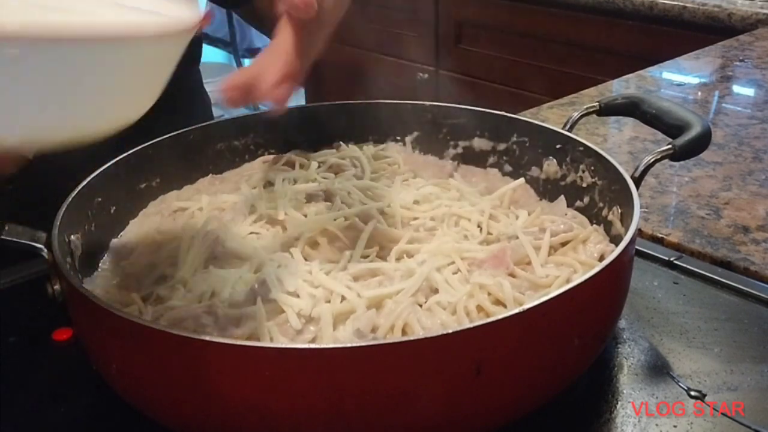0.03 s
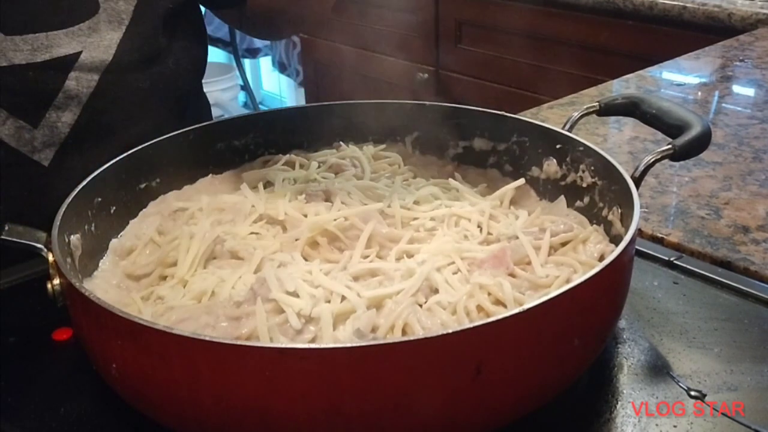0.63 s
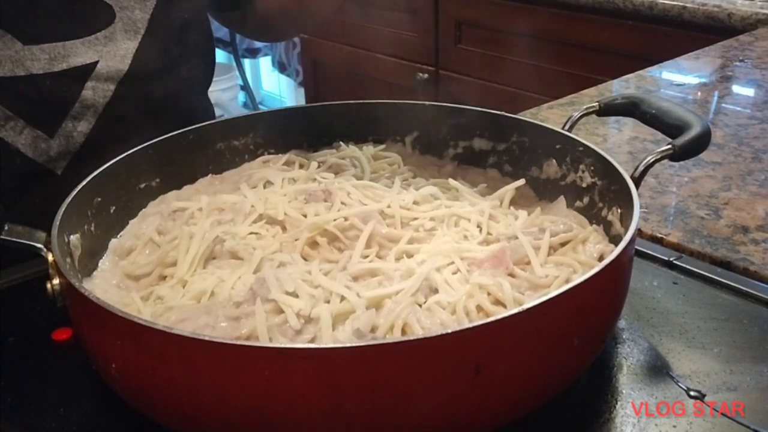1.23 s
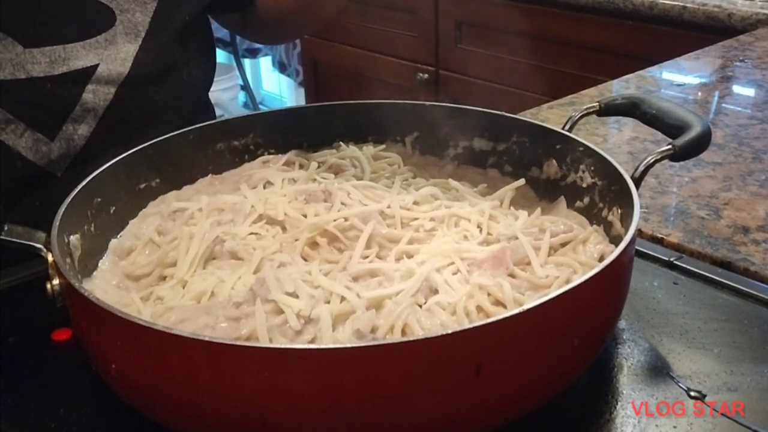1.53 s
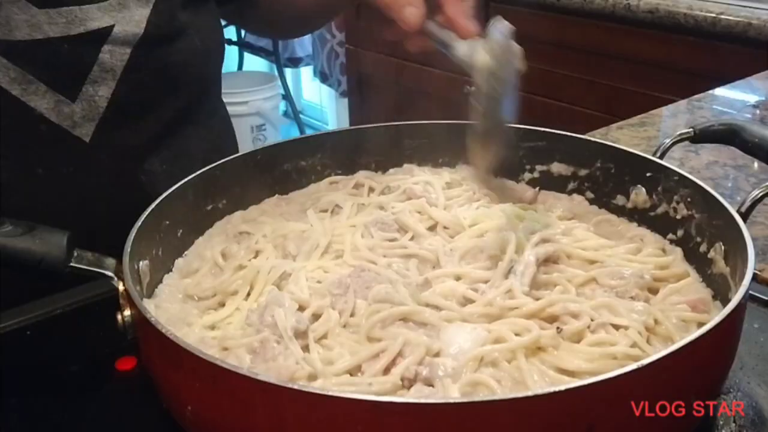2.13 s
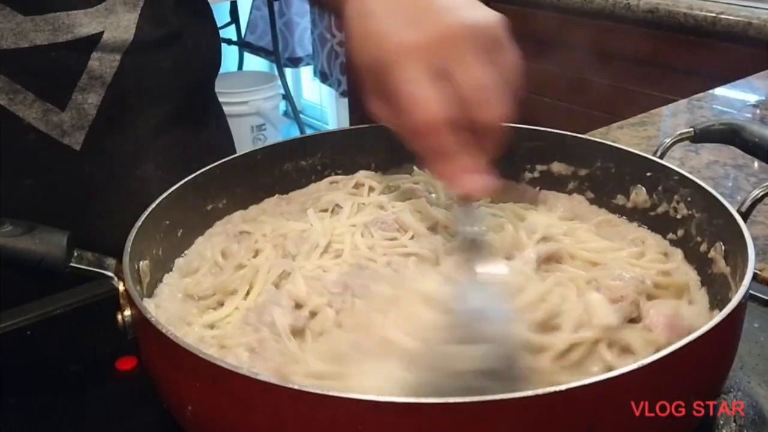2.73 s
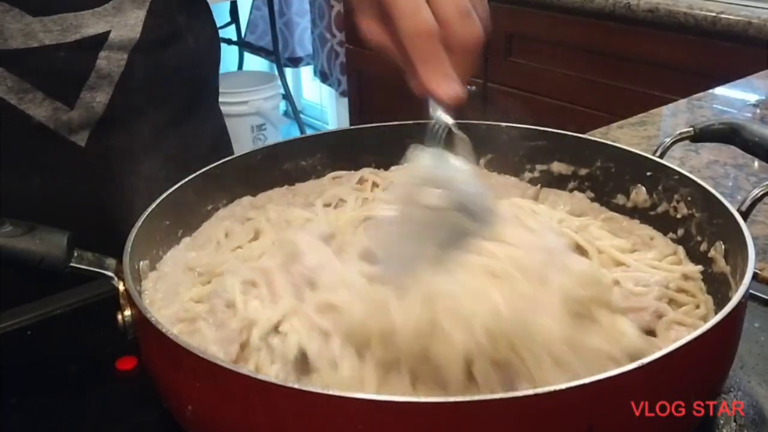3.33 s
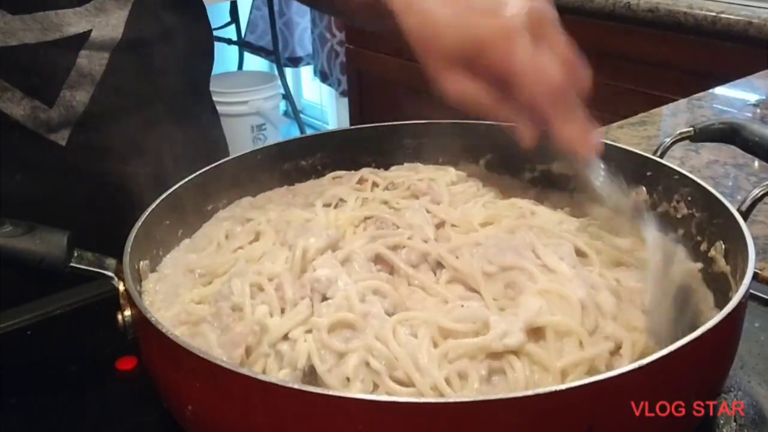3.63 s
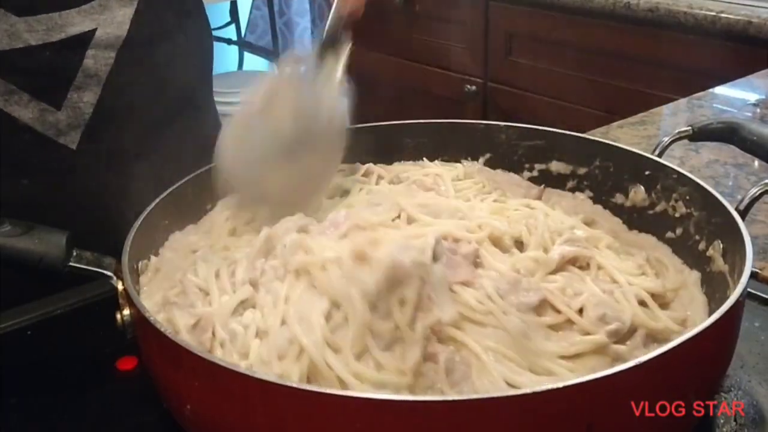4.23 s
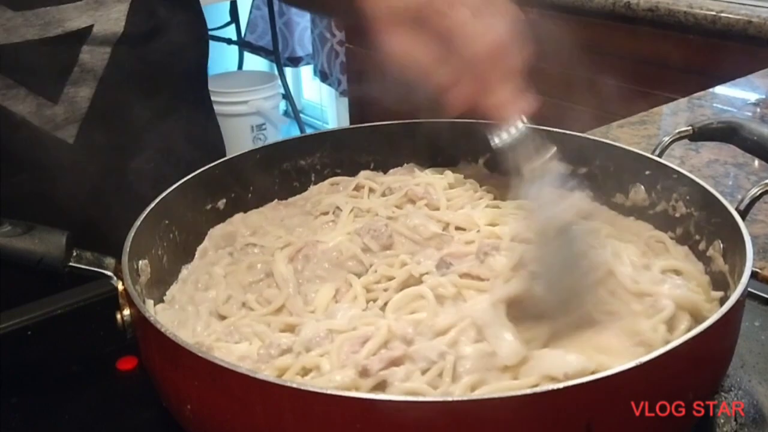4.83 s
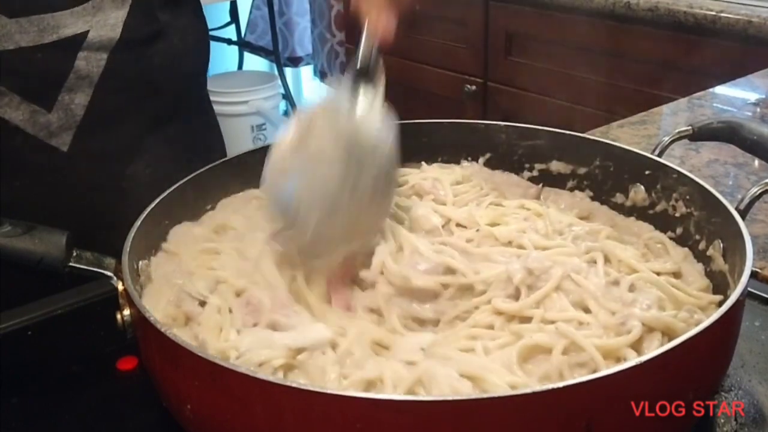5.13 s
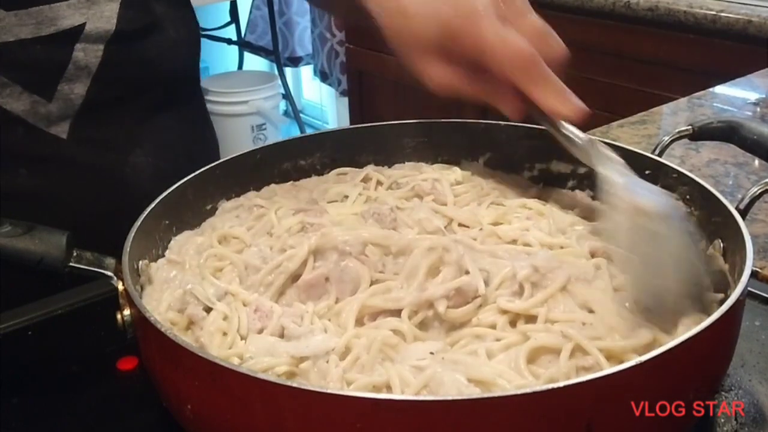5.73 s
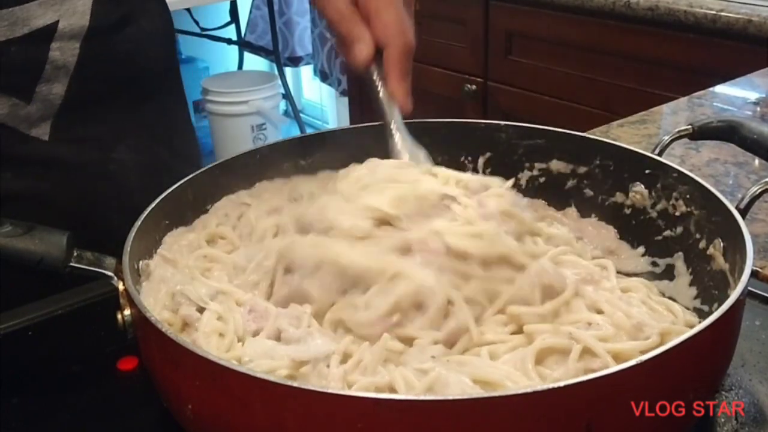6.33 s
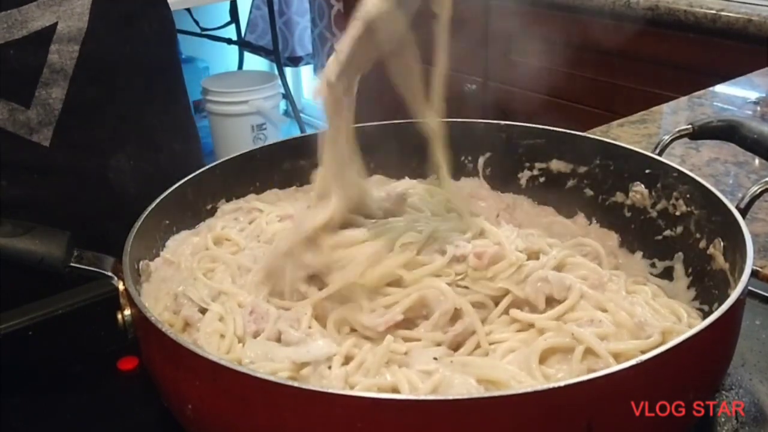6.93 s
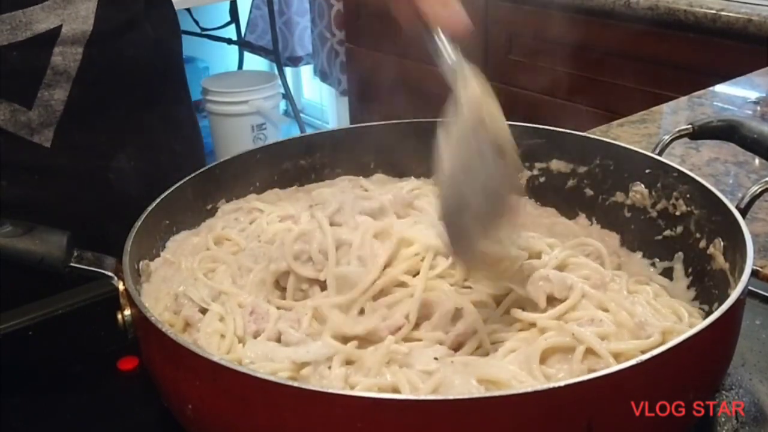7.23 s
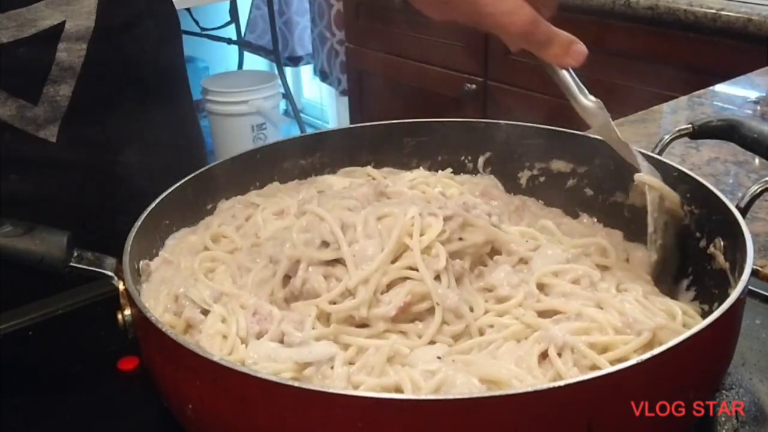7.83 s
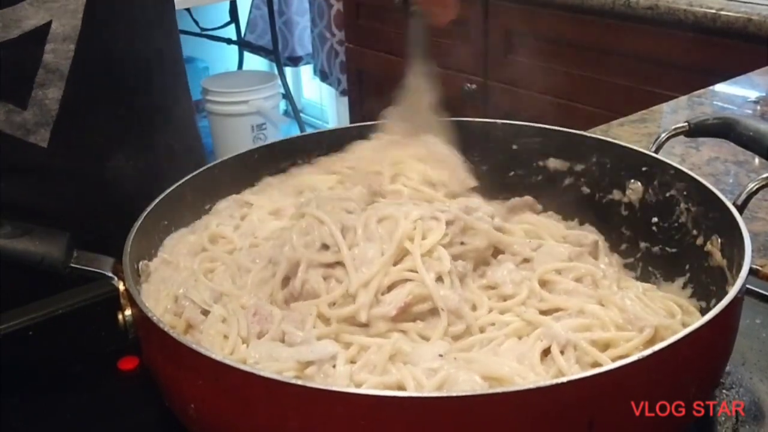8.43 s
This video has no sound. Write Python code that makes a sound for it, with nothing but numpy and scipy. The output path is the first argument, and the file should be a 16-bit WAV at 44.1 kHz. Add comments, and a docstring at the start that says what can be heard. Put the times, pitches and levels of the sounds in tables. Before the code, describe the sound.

Heard close up in a small kitchen, a stove hums faintly while creamy noodles bubble and hiss in a pan. All sound cuts out for a moment, then stirring begins: sticky slops, wet crackles and little pops, broken by short clanks and scrapes of a metal spoon on the heavy pan. Steam spurts through the sauce again, and a last run of knocks and a squeaky scrape closes the stirring.

```python
"""Creamy pasta simmers in a wide pan on a humming stove in a small kitchen, fizzing with steam.
Early on a soft hiss swells to the right, until all sound pauses for a third of a second near 2 s.
Then a steel spoon turns the noodles, which slop and crackle wetly; it scrapes and squeaks along
the wall and, from 3.6 s, knocks against the pan. Around 7 s steam spurts through the sauce again,
and a last round of knocks, turns and scrapes ends the scene."""
import sys
import numpy as np
from scipy import signal
from scipy.fft import rfft, irfft, next_fast_len
from scipy.io import wavfile
from scipy.ndimage import uniform_filter1d

SR = 44100
rng = np.random.default_rng(int(sys.argv[2]) if len(sys.argv) > 2 else 0)


def store_wav(level_fs):
    """Save 16-bit WAV to argv[1]."""
    pcm = np.round(np.clip(np.atleast_2d(level_fs), -1, 1) * 32767)
    wavfile.write(sys.argv[1], SR, pcm.T.astype(np.int16))


N = 373968


def from_db(db):
    """Turn decibels into a number to multiply by."""
    return 10 ** (np.asarray(db) / 20)


def rms_one(x):
    """Scale a sound so that its average strength (rms) is 1."""
    return x / np.sqrt(np.mean(x ** 2) + 1e-20)


def at_hz(points, hz, column=1):
    """Read a table between its frequencies, on a log scale."""
    table = np.array(points)
    return np.interp(np.log(hz + 1e-3), np.log(table[:, 0]), table[:, column])


def convolve(x, response):
    """Give every sample of a sound the same trail of echoes."""
    return signal.oaconvolve(np.atleast_2d(x), np.atleast_2d(response), axes=-1)[:, :N]


def colour(x, points, column=1, size=8192):
    """Turn lows and highs up or down as a table says (a minimum-phase filter)."""
    gains = from_db(at_hz(points, np.fft.rfftfreq(size, 1 / SR), column))
    cepstrum = irfft(np.log(gains))
    cepstrum[1:size // 2] *= 2
    cepstrum[size // 2 + 1:] = 0   # nothing rings before its cause
    return convolve(x, irfft(np.exp(rfft(cepstrum))))


def band(x, edges_hz):
    """Keep what lies between two frequencies."""
    return signal.sosfilt(signal.butter(2, edges_hz, "band", fs=SR, output="sos"), x + 1e-18)


def resonance(x, hz, width_hz):
    """Ring at one pitch: the narrower the width, the longer the ring."""
    r = np.exp(-np.pi * width_hz / SR)
    feedback = [1, -2 * r * np.cos(2 * np.pi * hz / SR), r * r]
    return signal.lfilter(np.array([1, 0, -1]) * (1 - r * r) / 2, feedback, x + 1e-18)


def drift(per_s):
    """A random curve that wanders about 1 either side of zero."""
    steps = rng.standard_normal(4096)
    return np.interp(np.arange(N) / SR * per_s, np.arange(len(steps)), steps)


def grains(per_s, spread_db, size=N):
    """Random clicks of uneven size."""
    heights = from_db(spread_db * np.minimum(rng.exponential(1, size), 4))
    return rms_one(heights * rng.choice([-1, 1], size) * (rng.random(size) < per_s / SR))


def arch(start_s, length_s, power):
    """The samples of one push and its rise and fall; a small power flattens the top."""
    at = np.arange(int(start_s * SR), min(int((start_s + length_s) * SR), N))
    return at, np.sin(np.pi * (at - at[0]) / (length_s * SR)) ** power


# how alike left and right are in the room: f/Hz, likeness (1 = the same)
LIKENESS = [(130, 0.99), (290, 0.81), (640, 0.4), (1400, 0), (3000, 0)]
def stereo_noise(size):
    """White noise, alike on both sides in the bass and unrelated in the treble."""
    padded = next_fast_len(size, True)
    mid, side = rfft(rng.standard_normal((2, padded)))
    alike = at_hz(LIKENESS, np.fft.rfftfreq(padded, 1 / SR))
    spectrum = np.sqrt(1 + alike) * mid + np.sqrt(1 - alike) * side * [[1], [-1]]
    return rms_one(irfft(spectrum, padded)[:, :size])


def kitchen(x, near_db, near_t60, far_db, far_t60, size=22050):
    """Add quick echoes off pan, hob and counter, and the room's tail; t60 is seconds to fade 60 dB."""
    t = np.arange(size) / SR
    response = np.zeros((2, size))
    for db, t60 in ((near_db, near_t60), (far_db, far_t60)):
        echoes = stereo_noise(size) * from_db(-60 * t / t60)
        response += from_db(db) * rms_one(echoes) / np.sqrt(size)
    response[:, 0] += 1   # the direct sound
    return convolve(x, rms_one(response) / np.sqrt(size))


def all_over_pan(x, near_db, far_db, far_t60, spots=4):
    """The sound hops between a few spots in the pan, each with its own echoes."""
    spot = rng.integers(0, spots, N // 128 + 2)
    shares = [np.interp(np.arange(N) / 128, np.arange(len(spot)), spot == k) for k in range(spots)]
    return sum(kitchen(x * np.sqrt(share), near_db, 0.075, far_db, far_t60) for share in shares)


# the tones of the stove: f/Hz, width/Hz, level/dB
STOVE_TONES = [(121.3, 3.3, -58.5), (212.4, 18, -68.5), (270.2, 7, -65.5), (728, 21, -64)]
def stove_hum():
    """The stove hums in a few narrow, wavering bands of noise."""
    noise = stereo_noise(N)
    return sum(from_db(db) * rms_one(resonance(noise, hz, width)) for hz, width, db in STOVE_TONES)


# the tone of the room's air: f/Hz, level/dB
AIR_COLOUR = [(25, -43), (60, -3.5), (110, -6.5), (300, -13.5), (550, -8), (900, -18.5), (1900, -24.5),
              (4000, -16), (16000, -18.5)]
def room_air():
    """The air of the room is a faint, steady rush."""
    return from_db(-57.5) * rms_one(colour(stereo_noise(N), AIR_COLOUR))


# the sauce simmering by itself: t/s, slop level/dB, crackle level/dB
SIMMER = [(0, -59, -57.5), (1.05, -62, -56), (1.3, -53.5, -51), (1.5, -56.5, -57), (5.4, -65.5, -64),
          (8.48, -55, -55)]
def simmer_power():
    """How hard the simmer drives the slop and the wavering crackle."""
    t = np.arange(N) / SR
    times, slop_db, crackle_db = np.transpose(SIMMER)
    slop = from_db(np.interp(t, times, slop_db))
    crackle = from_db(np.interp(t, times, crackle_db) + 2.5 * drift(per_s=22))
    return slop ** 2, crackle ** 2


# the notes of the filled pan: f/Hz, width/Hz, level/dB
PAN_NOTES = [(730, 28.7, 12), (1256, 16, 1), (1410, 15, -5), (1630, 33, 1), (2710, 325, 3), (3130, 30, 3.5),
             (5010, 79, -7.5)]
def pan_ring(force, ring_db):
    """Whatever touches the pan makes its notes ring too."""
    return force + sum(from_db(db + ring_db) * resonance(force, hz, width) for hz, width, db in PAN_NOTES)


# the tone of the rocking pan and of the plopping sauce: f/Hz, level/dB
RUMBLE_COLOUR = [(25, -45), (72, -19.5), (97, -2), (125, 3), (165, -23), (260, -18), (600, -59.5)]
SLOP_COLOUR = [(60, -17.5), (170, 1.5), (280, -1), (480, -4), (750, -7.5), (1200, -14), (5000, -26)]
def sauce_slop(strength):
    """Thick sauce plops in the bass and rocks the pan."""
    heaves = from_db(3.7 * drift(per_s=22))
    rumble = from_db(2) * rms_one(colour(grains(400, 3.2) * heaves, RUMBLE_COLOUR))
    plops = pan_ring(grains(700, 3.7), ring_db=2)
    plops = all_over_pan(plops, near_db=7, far_db=6.5, far_t60=0.29)
    return (rumble + rms_one(colour(plops, SLOP_COLOUR))) * strength


# spurts of steam: t/s, length/s, level/dB
SPURTS = [(0.0, 0.092, -44), (0.355, 0.02, -44.5), (0.79, 0.075, -48), (0.972, 0.019, -50),
          (1.086, 0.032, -44.5), (1.17, 0.068, -47), (1.538, 0.06, -49), (4.97, 0.14, -53),
          (6.878, 0.1, -46), (7.028, 0.084, -48.5), (7.275, 0.057, -49.5), (7.384, 0.079, -48.5),
          (7.544, 0.054, -47)]
# the tone of their fizz: f/Hz, level/dB
FIZZ_COLOUR = [(6000, -5), (8000, -3), (16000, -2)]
def steam_spurts(attack_s=0.0021, sag_db_per_s=54, t60=0.071):
    """Steam fizzes through the sauce: each spurt opens quickly, sags, then dies."""
    flow, t = np.zeros(N + SR), np.arange(SR // 2) / SR
    for start_s, length_s, db in SPURTS:
        fall_db = sag_db_per_s * t + 60 * np.maximum(t - length_s, 0) / t60
        at = int(start_s * SR)
        flow[at:at + len(t)] += (1 - np.exp(-t / attack_s)) * from_db(db - fall_db)
    return colour(grains(3910, 3.2), FIZZ_COLOUR) * flow[:N]


# the tone of the wet crackle: f/Hz, level/dB
CRACKLE_COLOUR = [(500, -32.5), (1300, -18), (2000, -19), (6500, -9.5), (9000, -1), (16000, 3)]
def noodle_crackle(strength):
    """Tiny films of sauce between the noodles burst in clumps, joined by the steam's fizz."""
    clumps = from_db(2 * drift(per_s=45))
    films = grains(2200, 2.1) * clumps * strength
    bursts = all_over_pan(films + steam_spurts(), near_db=5, far_db=0, far_t60=0.3)
    return from_db(7) * pan_ring(colour(bursts, CRACKLE_COLOUR), ring_db=0)


PAUSE_START_S, PAUSE_END_S = 1.822, 2.176
# the tone of the hiss's bright part: f/Hz, level/dB
HISS_COLOUR = [(300, -11), (1100, -21), (2100, 3), (5500, 6.5), (7000, -0.5), (9000, -24), (16000, -4)]
def soft_hiss(swell_start_s=0.68, swell_s=0.57):
    """A hiss to the right starts faint and dull, swells and brightens, and ends at the pause."""
    t = np.arange(N) / SR
    level = np.interp(t - swell_start_s, [0, swell_s], from_db([-62, -49.5])) * (t < PAUSE_START_S)
    swell = np.sqrt(level / level.max())
    dull = from_db(-60.5) * swell * rms_one(band(stereo_noise(N), (1450, 2500)))
    bright = level * swell * rms_one(colour(stereo_noise(N), HISS_COLOUR))
    return (flutter(dull + bright) + hiss_surges()) * from_db([[-6], [5]])   # left, right


def flutter(x, depth_db=2.2):
    """Each of six bands of the hiss wavers by itself."""
    edges_hz = np.geomspace(1500, 7000, 5)
    spectrum = rfft(x, next_fast_len(N, True))
    which = np.searchsorted(edges_hz, np.linspace(0, SR / 2, spectrum.shape[-1]))
    bands = (irfft(spectrum * (which == k))[:, :N] for k in range(6))
    return sum(part * from_db(depth_db * drift(per_s=30)) for part in bands)


# surges of the hiss: t/s, length/s, f/Hz, level/dB
HISS_SURGES = [(1.383, 0.14, 5300, -51.5), (1.686, 0.13, 2350, -54)]
def hiss_surges(width_hz=1500):
    """The hiss swells briefly, each time around a different pitch."""
    out = np.zeros((2, N))
    for start_s, length_s, hz, db in HISS_SURGES:
        at, swell = arch(start_s, length_s, power=0.94)
        noise = resonance(stereo_noise(len(at)), hz, width_hz)
        out[:, at] += from_db(db) * swell * rms_one(resonance(noise, hz, width_hz))
    return out


# turns of the noodles: t/s, build-up/s, drag/s, slop level/dB, crackle level/dB
TURNS = [(2.15, 0.15, 0.33, -48, -50.5), (2.48, 0.11, 0.88, -42.5, -42), (3.64, 0.094, 0.31, -43, -39.5),
         (4.1, 0.18, 0.21, -49.5, -43), (4.902, 0.087, 0.065, -56.5, -50.5),
         (5.78, 0.28, 0.063, -39.5, -44), (6.2, 0.046, 0.54, -58, -50.5), (7.879, 0.014, 0.047, -44, -46),
         (8.18, 0.081, 0.25, -45, -45.5)]
def turning_power(sag_db_per_s=1.5, settle_t60=1):
    """Each turn builds up slop and crackle; they sag as the load slides off the spoon, then settle."""
    t = np.arange(N) / SR
    *timing, slop_db, crackle_db = np.transpose(TURNS)
    start, build, drag = np.array(timing)[:, :, None]
    dragged = np.maximum(t - start - build, 0)
    fall_db = sag_db_per_s * dragged + 60 * np.maximum(dragged - drag, 0) / settle_t60
    motion = np.clip((t - start) / build, 0, 1) * from_db(-fall_db)
    return from_db(slop_db) ** 2 @ motion ** 2, from_db(crackle_db) ** 2 @ motion ** 2


def gliding_ring(hz, width_hz):
    """Tiny slips keep a note ringing at an even level while its pitch is free to slide."""
    tone = np.exp(2j * np.pi * np.cumsum(hz) / SR)
    slips = grains(5000, 3.8, size=len(hz))
    lowpass = signal.butter(2, width_hz / 2, fs=SR, output="sos")
    ringing = signal.sosfilt(lowpass, slips / tone + 1e-18)   # keeps only what is near the note
    level = np.sqrt(np.abs(uniform_filter1d(np.abs(ringing) ** 2, 1024)) + 1e-20)
    return rms_one((ringing / level * tone).real)


def glides(rows):
    """Squeaks or squelches: a rough note slides in pitch during one push."""
    out = np.zeros(N)
    for start_s, length_s, from_hz, to_hz, width_hz, db in rows:
        at, pressure = arch(start_s, length_s, power=0.1)
        hz = np.interp(np.arange(SR // 2) / SR, [0, length_s], [from_hz, to_hz])
        out[at] += from_db(db) * pressure * gliding_ring(hz, width_hz)[:len(at)]
    return out


# the spoon squeaks down the wall: t/s, length/s, first f/Hz, last f/Hz, width/Hz, level/dB
SQUEAKS = [(2.544, 0.049, 2740, 2850, 1730, -41.5), (8.252, 0.04, 2660, 3360, 1300, -35),
           (8.256, 0.18, 1820, 1770, 200, -44), (8.30, 0.16, 2980, 5800, 1800, -45),
           (8.368, 0.077, 1660, 1300, 503, -34.5), (8.388, 0.16, 747, 730, 45, -42),
           (8.40, 0.039, 6000, 5970, 220, -36)]
# the low (body), middle (rasp) and high (edge) bands of spoon on pan: lowest f/Hz, highest f/Hz
SPOON_BANDS = [(250, 1900), (2100, 6500), (6500, 15500)]
# pushes of the spoon: t/s, length/s, body level/dB, rasp level/dB, edge level/dB
SCRAPES = [(2.587, 0.29, -45, -47, -47), (2.648, 0.1, -47, -37.5, -37.5), (2.788, 0.029, -52, -41, -35.5),
           (3.68, 0.15, -46, -41.5, -36), (4.408, 0.22, -53.5, -51, -48.5), (5.968, 0.071, -38, -40.5, -61),
           (5.989, 0.28, -38.5, -36, -32), (8.27, 0.2, -43.5, -44, -48), (8.36, 0.07, -68, -39.5, -39)]
def spoon_scrapes():
    """The spoon's edge sticks and slips along the wall, sending dense, uneven clicks into the pan."""
    trends_db_per_s = (-38, -28, 11)   # body, rasp, edge: a scrape thins and brightens as it goes
    force = np.zeros(N)
    slips = [rms_one(band(grains(5000, 4.6), edges)) for edges in SPOON_BANDS]
    grip = from_db(1.64 * drift(per_s=130))
    for start_s, length_s, *levels_db in SCRAPES:
        at, pressure = arch(start_s, length_s, power=0.35)
        from_middle_s = at / SR - start_s - length_s / 2
        for db, trend, slip in zip(levels_db, trends_db_per_s, slips):
            force[at] += pressure * from_db(db + trend * from_middle_s) * slip[at]
    scraping = pan_ring((force + glides(SQUEAKS)) * grip, ring_db=-7)
    return all_over_pan(scraping, near_db=6.5, far_db=-0.5, far_t60=0.72)


# short sharp ticks and pops (sauce popping, and one light tick of the spoon on the pan):
# t/s, f/Hz, level/dB
TICKS_AND_POPS = [(3.285, 9900, -44), (3.783, 9600, -27), (4.32, 5270, -40), (4.371, 9700, -38),
                  (6.905, 9500, -40), (7.035, 9400, -41.5), (7.332, 2730, -50)]
# wet squelches: t/s, length/s, first f/Hz, last f/Hz, width/Hz, level/dB
SQUELCHES = [(3.696, 0.07, 480, 720, 500, -35.5), (5.995, 0.07, 420, 750, 500, -38)]
def ticks_pops_and_squelches(ring_t60=0.07, size=4096):
    """Each pop of the sauce, and one tick of the spoon, rings briefly; squelches slide upward."""
    out, t = glides(SQUELCHES), np.arange(size) / SR
    for start_s, hz, db in TICKS_AND_POPS:
        at = int(start_s * SR)
        ring = gliding_ring(np.full(size, hz), width_hz=hz / 4)
        out[at:at + size] += ring * from_db(db - 60 * t / ring_t60)
    return kitchen(out, near_db=-11, near_t60=0.027, far_db=1, far_t60=0.16)


# the spoon hits the pan: t/s, chatter t60/s, thump rise/s, thump level/dB,
# body f/Hz, body level/dB, rasp f/Hz, rasp level/dB, edge level/dB
KNOCKS = [(3.647, 0.056, 0.028, -20, 446, -23.5, 2750, -18, -14.5),
          (3.797, 0.0077, 0.015, -34, 750, -40, 5000, -24, -5),
          (4.863, 0.064, 0.0091, -45, 2460, -51.5, 3980, -48, -38),
          (5.779, 0.063, 0.016, -28.5, 610, -35, 4300, -26.5, -21.5),
          (5.968, 0.073, 0.022, -21.5, 350, -28, 3500, -25, -33),
          (7.772, 0.039, 0.011, -31.5, 790, -39, 2950, -31, -27),
          (7.895, 0.044, 0.0077, -23, 1550, -16, 3400, -20.5, -24),
          (8.051, 0.065, 0.012, -37, 1630, -39, 3000, -49, -56),
          (8.152, 0.053, 0.021, -32, 1090, -25, 3730, -29, -25)]
def spoon_knocks(thump_hz=126.2, upper_hz=184.6, size=11025):
    """Steel chatters, its tone set by where the spoon lands; the heavy pan rocks with a low thump."""
    out, t = np.zeros((2, N + SR)), np.arange(size) / SR
    swing = np.sin(2 * np.pi * thump_hz * t) + from_db(-9.5) * np.sin(2 * np.pi * upper_hz * t)
    for start_s, t60, rise_s, thump_db, body_hz, body_db, rasp_hz, rasp_db, edge_db in KNOCKS:
        body, base, rasp, edge = (stereo_noise(size) for _ in range(4))
        force = from_db(body_db) * rms_one(resonance(body, body_hz, width_hz=740))
        force += from_db(body_db - 7.5) * rms_one(resonance(base, hz=322, width_hz=210))   # dull base
        force += from_db(rasp_db) * rms_one(resonance(band(rasp, SPOON_BANDS[1]), rasp_hz, width_hz=3200))
        force += from_db(edge_db) * rms_one(band(edge, SPOON_BANDS[2]))
        chatter = (1 - np.exp(-t / 0.001)) * from_db(2.5 - 60 * t / t60)
        clank = pan_ring(force * chatter, ring_db=-3)
        clank = kitchen(clank, near_db=-5, near_t60=0.035, far_db=-4.5, far_t60=0.27)
        rocking = (t / rise_s * np.exp(1 - t / rise_s)) ** 2.1
        clank[:, :size] -= from_db(thump_db) * swing * rocking
        at = int(start_s * SR)
        out[:, at:at + clank.shape[1]] += clank
    return out[:, :N]


def scene():
    """Pasta, spoon and kitchen together; simmering and turning add their power to move the pasta."""
    slopping, crackling = np.sqrt(np.add(simmer_power(), turning_power()))
    pasta = sauce_slop(slopping) + noodle_crackle(crackling)
    pan = pasta + ticks_pops_and_squelches() + spoon_knocks() + spoon_scrapes()
    return pan + stove_hum() + room_air() + soft_hiss()


# the tone of the microphone's two openings: f/Hz, left level/dB, right level/dB
MIC_COLOUR = [(59, -1.5, -0.5), (422, 3, 1), (587, -3.5, -5), (1110, 2.5, 0), (1395, -0.5, 1),
              (6970, 0, -0.5), (8540, 6.5, -9), (9500, 8.5, -10.5), (11450, -3, -19), (15800, -12, -16.5)]
def record(dry, cutoff_hz=15850):
    """The left opening rings in the high treble, the right is dull; one short pause; the top is cut."""
    heard = np.vstack([colour(dry[0], MIC_COLOUR, column=1), colour(dry[1], MIC_COLOUR, column=2)])
    t = np.arange(N) / SR
    heard *= (t < PAUSE_START_S) | (t > PAUSE_END_S)
    return signal.sosfilt(signal.ellip(12, 0.1, 90, cutoff_hz, fs=SR, output="sos"), heard)


dry = scene()
out = record(dry)
store_wav(out)
```